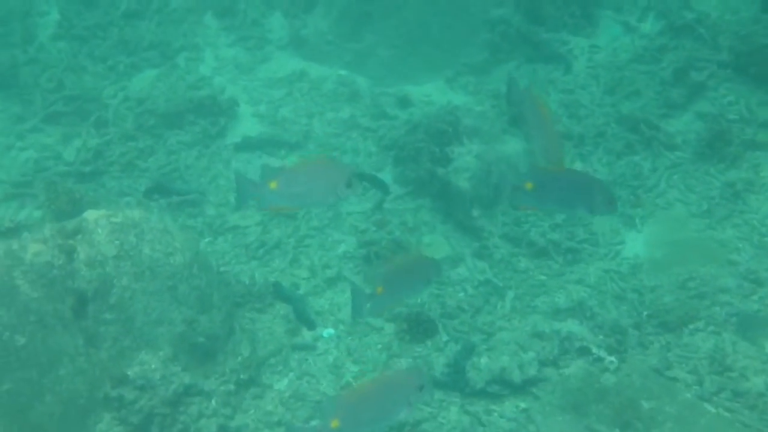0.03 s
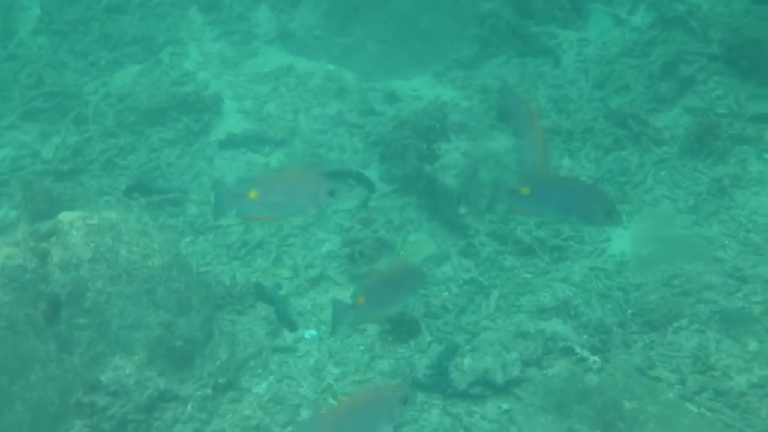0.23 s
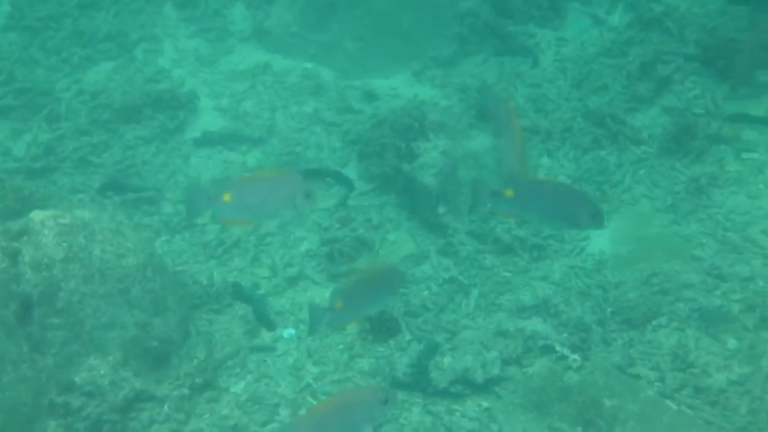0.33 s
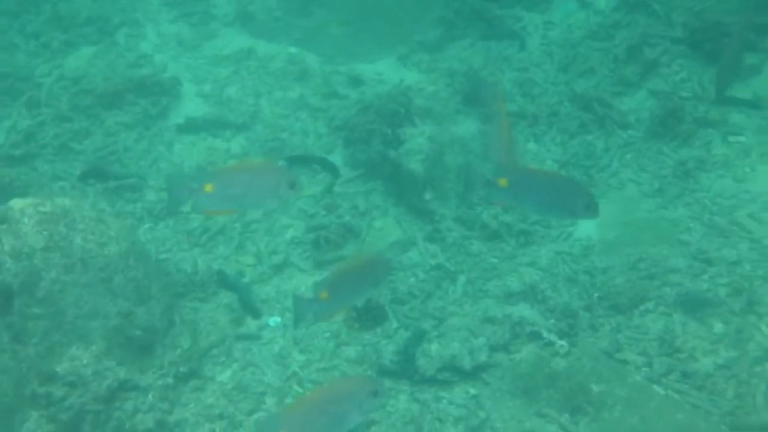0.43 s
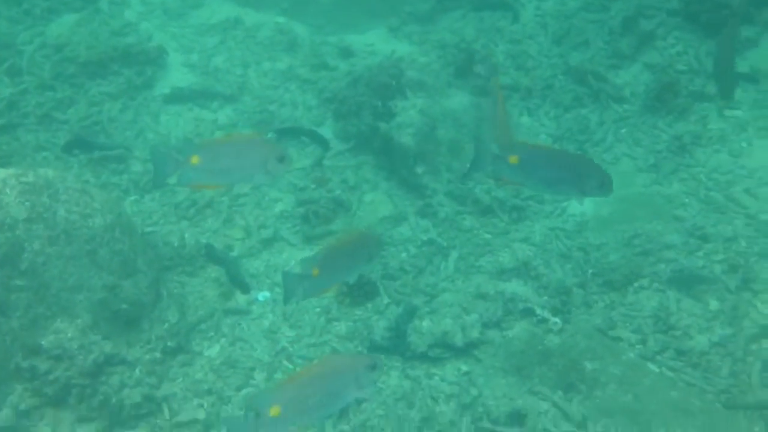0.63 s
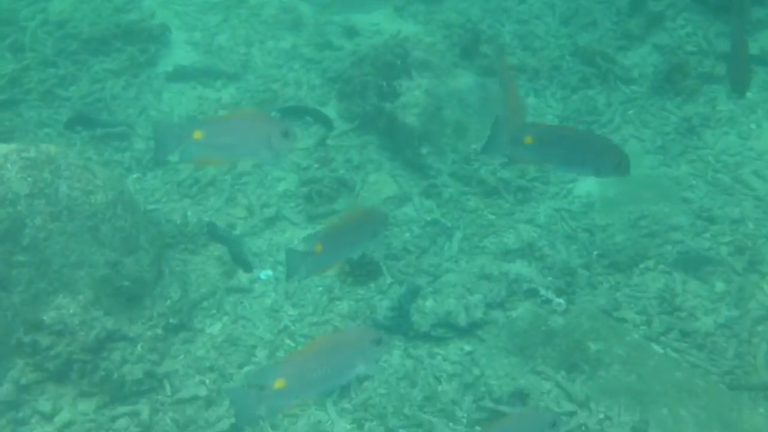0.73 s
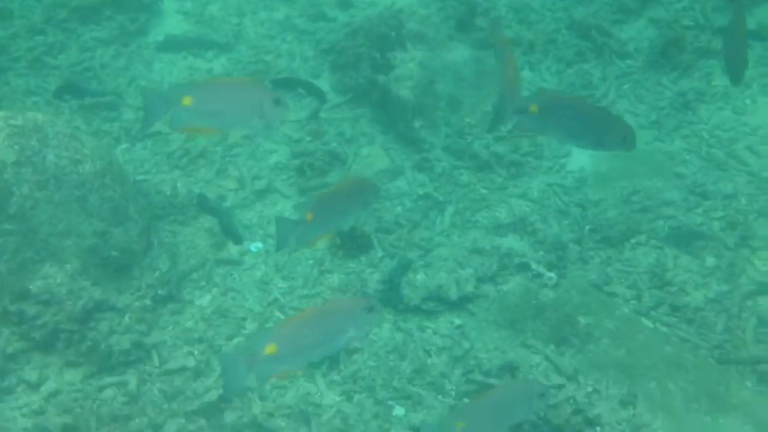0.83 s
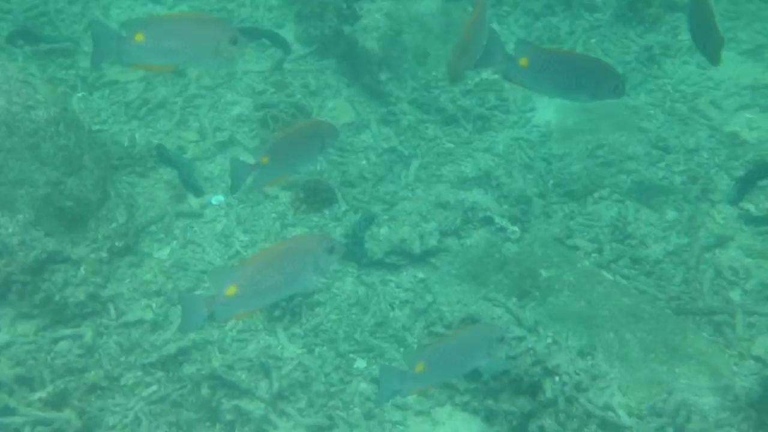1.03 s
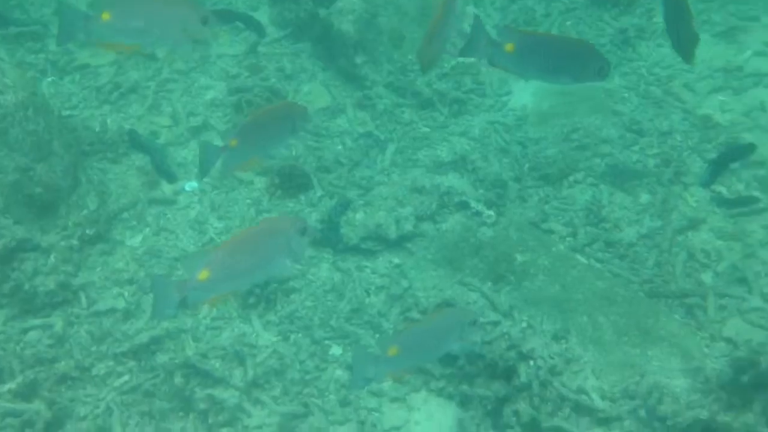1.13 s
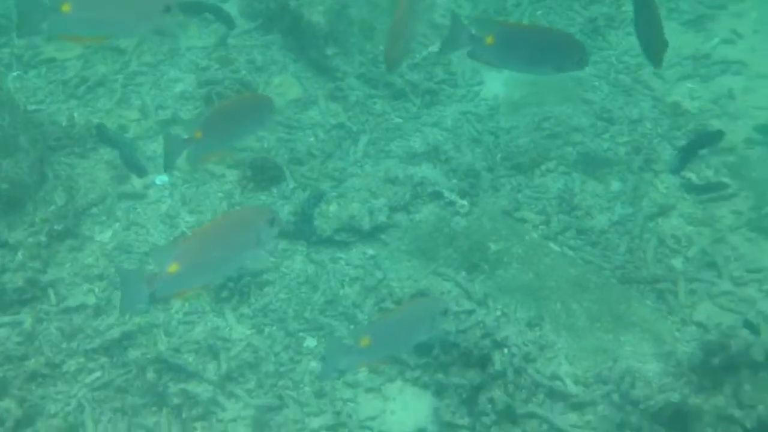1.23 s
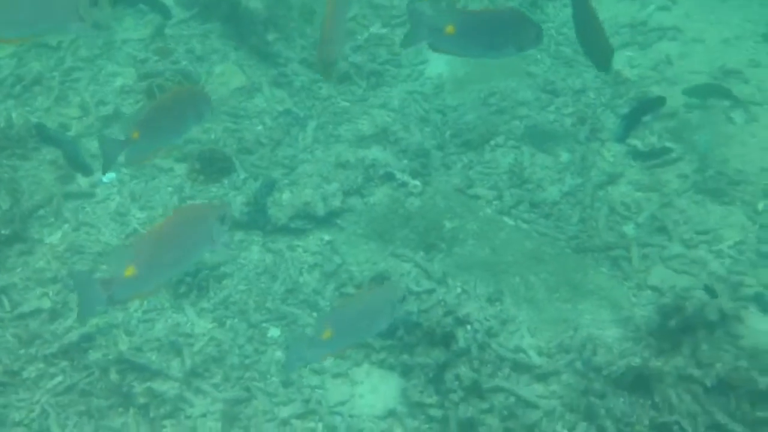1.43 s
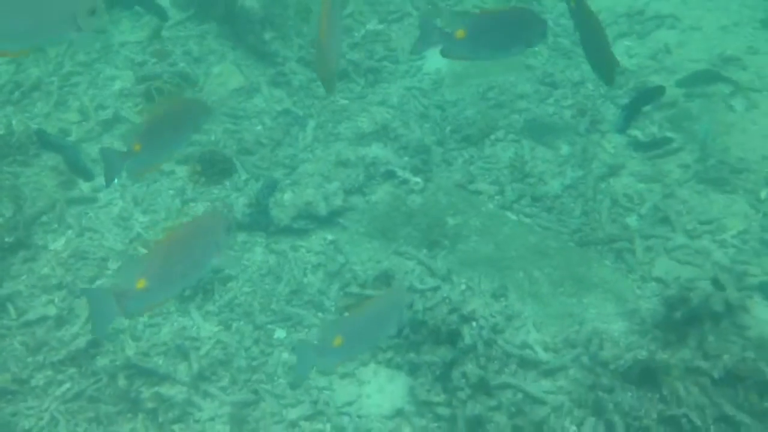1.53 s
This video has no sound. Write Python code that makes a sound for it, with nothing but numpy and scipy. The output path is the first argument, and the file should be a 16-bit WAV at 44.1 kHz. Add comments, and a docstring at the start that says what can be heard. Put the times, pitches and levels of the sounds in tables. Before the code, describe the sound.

Snapping shrimp crackle irregularly for about 1.6 seconds underwater on a shallow reef: short, bright, dry clicks with tiny reflections over a dense, faint distant crackle. Dull knocks gather early, with one strong low thump near 0.24 s and weaker ones after. A hollow low surge swells around 0.8-1.1 s, then eases; some stronger snaps follow at 1.13-1.43 s. Muffled case sound, steady water, faint hiss.

```python
"""A camera in a sealed case, under water over a shallow coral reef.
Snapping shrimp crackle throughout: each near click rings the damped modes of the case and echoes off the
reef, over a dense far crackle. Short dull knocks (fish or the case) are decaying tones, the strongest
near 0.24 s. Surge is noise in two groups of low resonances, swelling together around 0.9 s.
Shaped noise makes the steady water and the faint microphone hiss."""
import sys
import numpy as np
from scipy import signal
from scipy.fft import rfft, irfft
from scipy.io import wavfile

SR = 44100
rng = np.random.default_rng(int(sys.argv[2]) if len(sys.argv) > 2 else 0)


def unload_wav(signal):
    """Save mono or channel-first audio to the path in sys.argv[1] as 16-bit WAV at rate SR, clipped to [-1, 1]."""
    wavfile.write(
        sys.argv[1],
        SR,
        np.round(np.clip(np.atleast_2d(signal).T, -1, 1) * 32767).astype(np.int16),
    )


def decibels_to_gain(level_db):
    """Convert a level in decibels to a linear amplitude gain (20 dB per decade)."""
    exponent = np.asarray(level_db, float) / 20
    return 10 ** exponent


N = 70560   # samples: 1.6 s


def near_snaps():
    """Impulse excitation: each snap is a bare crack plus treble and body rings, all with reflections."""
    # near shrimp snaps, levels before the offsets below: (time [s], treble level [dB], body level [dB],
    # crack level [dB], treble centre [Hz], body tilt [dB per octave])
    snaps = [(0.0138, -41.5, -64, -72.0, 4250, 1), (0.021, -30.5, -48, -55, 4870, -2),
             (0.0602, -38.5, -47, -76.0, 4160, -6), (0.0666, -39, -38.5, -75.0, 4150.0, 3.5),
             (0.0878, -33.0, -37.5, -56, 4130.0, 5.5), (0.0916, -34.0, -41.5, -64, 5240, 3),
             (0.1158, -37, -41.5, -72.0, 4380.0, -6), (0.1419, -41.5, -51, -64, 5500, -1.0),
             (0.2255, -55, -67, -63.0, 4800, 4), (0.2544, -48, -45, -74.0, 4500, 1),
             (0.2563, -43, -49, -73.0, 4570, -1), (0.2625, -46, -63, -61.0, 5450.0, -1.0),
             (0.2864, -39, -46, -76, 4200, 4.5), (0.3169, -37.5, -43.5, -72, 4300, 2),
             (0.3442, -44, -54, -73.0, 4200, 1), (0.3931, -32.5, -36.5, -51.5, 4820.0, -7),
             (0.4031, -47.0, -45, -60, 5700, -4), (0.4256, -56, -49, -76.0, 5000.0, -8),
             (0.4305, -43, -61, -78.0, 4700, -5), (0.489, -50, -62, -74.0, 4730.0, -1.0),
             (0.5021, -47, -61, -73.0, 4400, -4), (0.5127, -52, -54, -72.0, 4770.0, -1.0),
             (0.5418, -45, -50, -71, 5140, -2), (0.599, -48.0, -69, -59.5, 4790.0, -3),
             (0.6045, -45, -60, -75.0, 4240.0, -1.0), (0.6107, -45.5, -44, -75.0, 4280.0, 3.5),
             (0.617, -43, -59, -65, 4760, 3), (0.673, -33.0, -43.5, -64, 4700, 2.0),
             (0.689, -45, -69, -58.0, 5330.0, -1.0), (0.7656, -50, -64, -75.0, 4780.0, -1.0),
             (0.8122, -33, -32.5, -78.0, 4550, -1), (0.8417, -31, -31.0, -54.5, 4650.0, -1.5),
             (0.8916, -46, -57, -67, 4200, 2), (0.9364, -45, -57, -75.0, 4800, -3),
             (0.941, -31.0, -39, -53, 4620, -1), (1.0035, -47, -63, -76.0, 4570, -3),
             (1.037, -43, -44, -78.0, 4230, 3), (1.0447, -41, -33, -75.0, 4400.0, 0.5),
             (1.0801, -32.0, -59, -50, 5300, -4), (1.114, -53, -57, -75.0, 4750, 1),
             (1.1335, -26.5, -29, -61, 4000, 2), (1.157, -47, -61, -72.0, 4470, -6),
             (1.2093, -53, -31, -72.0, 4700, -10), (1.2927, -47.5, -45, -60, 4390.0, 3),
             (1.3286, -49, -25, -60, 4060.0, -4), (1.3617, -43.0, -49, -76.0, 4240.0, 3),
             (1.3634, -44, -50, -76.0, 4500, 3), (1.4071, -43, -47, -62, 4360.0, 3),
             (1.4339, -27.0, -33.5, -55, 4760, -10), (1.4495, -48, -48, -75.0, 5700, 5),
             (1.478, -41.5, -53, -75.0, 4460.0, 3), (1.4895, -45.5, -54, -64, 5700, 4),
             (1.4977, -40, -56, -74.0, 4550.0, -1.0), (1.5072, -44.0, -61, -76.0, 4310.0, -4),
             (1.5521, -40, -45.5, -76.0, 5180.0, 4), (1.5573, -38, -42, -73.0, 4190.0, 0)]
    treble_offset_db, body_offset_db, crack_offset_db = -4, -6, 12.5
    time_s, treble_db, body_db, crack_db, centre_hz, tilt_db = np.transpose(snaps)
    at = (time_s * SR).astype(int)
    clicks = np.zeros(N)
    clicks[at] = decibels_to_gain(crack_db + crack_offset_db)
    bright = treble(at, treble_db + treble_offset_db, centre_hz) + crack(clicks)
    low = body(at, body_db + body_offset_db, tilt_db)
    return scatter(bright, tail_db=-26) + scatter(low, tail_db=-10)   # the low ring scatters more


def treble(at, db, centre_hz):
    """Modal synthesis: the high case modes, excited most strongly near each snap's centre frequency."""
    # high modes of the case: (frequency [Hz], relative level [dB], 60 dB decay time [s])
    treble_modes = [(3560, 1, 0.0093), (3835, -0.5, 0.0089), (4300, 3.5, 0.0065), (4860, -0.5, 0.0089),
                    (5370, -1, 0.0067), (6150, -1, 0.0058), (6830, -1, 0.0095), (7650, 1.5, 0.0084)]
    focus_db_per_oct2 = 53   # modes away from the centre ring weaker

    def focus_db(hz):
        return -focus_db_per_oct2 * np.log2(hz / centre_hz) ** 2

    return strike(at, db, treble_modes, focus_db, sign=-1)


def body(at, db, tilt_db):
    """Modal synthesis: the low case modes, with a spectral tilt about 1 kHz for each snap."""
    # low modes of the case: (frequency [Hz], relative level [dB], 60 dB decay time [s])
    body_modes = [(610, -5, 0.011), (780, 0.5, 0.011), (936, -3, 0.011), (1250, -2.5, .012),
                  (1670, -3, 0.0064), (1970, -2.5, 0.0048), (2410, -5.5, 0.0043), (3110, -7.5, 0.0041)]
    rung = strike(at, db, body_modes, lambda hz: tilt_db * np.log2(hz / 1000), sign=1)
    band = signal.butter(2, [480, 3300], "band", fs=SR, output="sos")
    return signal.sosfilt(band, rung)


def crack(clicks):
    """Broadband impulse: high-passing leaves the bare click without the case modes."""
    return signal.sosfilt(signal.butter(2, 7000.0, "high", fs=SR, output="sos"), clicks)


def strike(at, db, modes, colour_db, sign):
    """Modal superposition: every click rings every mode at a random strength; the case dulls the sum."""
    mode_spread_db, case_dull_hz = 1.5, 8200
    out = np.zeros(N)
    luck = rng.standard_normal((len(at), len(modes)))
    for k, (hz, level_db, t60) in enumerate(modes):
        strength_db = db + level_db + mode_spread_db * luck[:, k] + colour_db(hz)
        clicks = np.zeros(N)
        np.add.at(clicks, at, decibels_to_gain(strength_db) * sign ** k)   # sign -1 alternates the polarity of the modes
        out -= ring(clicks, hz, t60)
    return signal.sosfilt(signal.butter(4, case_dull_hz, "low", fs=SR, output="sos"), out)


def ring(drive, hz, t60):
    """Damped resonator: a two-pole filter answers a unit click with a decaying sine."""
    radius = decibels_to_gain(-60 / (t60 * SR))
    angle = 2 * np.pi * hz / SR
    poles = [1, -2 * radius * np.cos(angle), radius * radius]
    return signal.lfilter([0, np.sin(angle)], poles, drive + 1e-18)


def scatter(x, tail_db):
    """Multipath propagation: direct sound, one echo and a short, sparse, decaying tail off the reef."""
    echo_s, echo_db, tail_t60_s = 0.0045, -16, 0.035
    t = np.arange(SR // 10) / SR
    path = decibels_to_gain(tail_db - 60 * t / tail_t60_s) * rng.standard_normal(len(t))
    path = path * (rng.random(len(t)) < 0.05)   # few of the samples carry a reflection
    path[0] = 1   # direct sound
    path[int(echo_s * SR)] += decibels_to_gain(echo_db)
    return signal.fftconvolve(x, path)[:N]


def far_snaps():
    """Random point process: dense distant snaps, their rate drifting, ring the modes of the same case."""
    median_per_s, rate_drift_db = 700, 3.0
    treble_rms_db, body_rms_db = -63.5, -67
    born = rng.random(N) < median_per_s * decibels_to_gain(rate_drift_db * drift(8.0)) / SR
    db = 4 * np.minimum(rng.exponential(1, N), 3.5)   # many weak, few strong
    centre_hz = 4750 * 2 ** (0.24 * rng.standard_normal(N))   # spread in octaves
    at = np.flatnonzero(born)
    bright = rms_one(treble(at, db[at], centre_hz[at]))
    low = rms_one(body(at, db[at], 0))
    return decibels_to_gain(treble_rms_db) * bright + decibels_to_gain(body_rms_db) * low


def knocks():
    """Transient oscillation: a few cycles swell, sag in pitch and die, the first swing negative."""
    # dull knocks: (time [s], envelope peak [dB], final frequency [Hz], nominal length [cycles])
    knock_list = [(0.062, -34, 104, 2.5), (0.11, -46, 150, 1.3), (0.17, -32.5, 528, 5.6),
                  (0.19, -38.5, 179, 6.9), (0.214, -28.5, 106.5, 1.85), (.2358, -14, 153.5, 1.6),
                  (.250, -42, 650, 8.5), (.260, -32, 174, 1.3), (0.269, -37.5, 140, 3.5),
                  (.292, -48, 444, 7.1), (0.289, -36.5, 119, 1.3), (0.345, -38, 206, 9.7),
                  (.348, -43.5, 481, 7), (.385, -52, 166, 1.3), (.423, -41.5, 477, 2.6),
                  (.461, -50, 610, 11), (.49, -44, 453, 2.7), (.538, -43.5, 444, 7.6),
                  (.436, -36.5, 194, 6.9), (.494, -44, 186, 4.2), (0.563, -58, 188, 3.8),
                  (0.581, -42, 164, 3.4), (0.646, -39.5, 150, 7.6), (.650, -48, 73, 1.9),
                  (.850, -36.5, 568, 24), (.80, -42.5, 202.7, 12.6), (0.931, -42.5, 193, 9.9),
                  (1.011, -39.5, 202, 15), (1.14, -38.5, 205, 5.6), (1.2125, -33.5, 820, 3.5),
                  (1.3295, -38.5, 760, 4.6), (1.231, -53, 85, 1.6), (1.277, -52, 78.5, 2.2),
                  (1.374, -37.5, 108, 1.4), (1.461, -47, 88.5, 2.4), (1.553, -45.5, 93, 2.7)]
    skew, sag_turns = 1.18, 0.24   # envelope power; extra turns from a pitch that starts high
    out = np.zeros(N)
    for start_s, db, hz, cycles in knock_list:
        turns = np.maximum(np.arange(N) / SR - start_s, 0) * hz
        u = turns / cycles * 4.9
        envelope = (u * np.exp(1 - u)) ** skew   # peak 1 at u = 1
        phase = turns + sag_turns * (1 - np.exp(-turns))
        out -= decibels_to_gain(db) * envelope * np.sin(2 * np.pi * phase)
    return out


def surge():
    """Resonant filtering: noise in two groups of case resonances, each following its own level curve."""
    # level curves of the surge: (time [s], low hum level [dB], upper hum level [dB])
    surge_levels = [(0.0, -53, -64.5), (0.204, -55, -60.5), (0.48, -57.5, -65), (0.618, -50, -53),
                    (0.842, -41, -47), (0.94, -43.5, -45.5), (1.068, -43, -49), (1.246, -49.5, -52),
                    (1.42, -48.5, -54), (1.6, -55, -49)]
    # low resonances: (frequency [Hz], nominal width [Hz], relative level [dB])
    low_peaks = [(150, 32, -6), (189.9, 37.7, -3.5), (237, 27.6, -13.5)]
    # upper resonances: (frequency [Hz], nominal width [Hz], relative level [dB])
    upper_peaks = [(475, 58, -6.5), (557.2, 38.3, 0), (650, 104, -9.5), (820, 510, -12)]
    time_s, low_db, upper_db = np.transpose(surge_levels)
    t = np.arange(N) / SR
    low = decibels_to_gain(np.interp(t, time_s, low_db)) * hum(low_peaks)
    upper = decibels_to_gain(np.interp(t, time_s, upper_db)) * hum(upper_peaks)
    return low + upper


def hum(peaks):
    """Resonant filtering: noise passes twice through each resonance, its level wavering; rms 1."""
    waver_db, waver_hz, low_cut_hz = 1.0, 15, 143
    out = 0
    for hz, width, db in peaks:
        noise = rng.standard_normal(N + SR // 4)   # the extra lead lets the resonance build up
        once = ring(noise, hz, 1.1 / width)
        twice = ring(once, hz, 1.1 / width)
        tone = rms_one(np.diff(twice)[-N:])   # the difference weakens the bass skirt
        out = out + decibels_to_gain(db + waver_db * drift(waver_hz)) * tone
    return rms_one(signal.sosfilt(signal.butter(3, low_cut_hz, "high", fs=SR, output="sos"), out))


def drift(rate):
    """Low-passed random process: noise slowed to a corner near rate [Hz]; rms 1."""
    r = np.exp(-2 * np.pi * rate / SR)
    slow = signal.lfilter([1], [1, -2 * r, r * r], rng.standard_normal(N + SR))
    return rms_one(slow[SR:])


def water():
    """Stationary noise: the steady water sound is noise with a fixed spectrum."""
    # water spectrum: (frequency [Hz], relative density [dB per Hz])
    water_spectrum = [(20, -22), (40, 6.5), (70, 9), (110, -45.5), (330, -13.5), (1000, -16), (2000, -11.5),
                      (2900, -17.5), (4400, -8), (7000, -14.5), (9300, -78)]
    return decibels_to_gain(-68) * coloured(water_spectrum)


def hiss():
    """Stationary noise: the self-noise of the microphone, mostly in the treble."""
    # hiss spectrum: (frequency [Hz], relative density [dB per Hz])
    hiss_spectrum = [(5000, -30), (8500, -0.5), (9300, -11.5), (10500, -8), (13000, -2), (15300, 2),
                     (17000, -33)]
    return decibels_to_gain(-77) * coloured(hiss_spectrum)


def coloured(points):
    """Spectral shaping: white noise weighted by a curve over log frequency; rms 1."""
    hz, db = np.transpose(points)
    grid = np.maximum(np.arange(N // 2 + 1) * SR / N, 1)
    curve_db = np.interp(np.log(grid), np.log(hz), db, left=-60, right=-60)
    return rms_one(irfft(rfft(rng.standard_normal(N)) * decibels_to_gain(curve_db), N))


def rms_one(x):
    """Normalisation: divide by the root mean square, so that the mean power is 1."""
    return x / np.sqrt(np.mean(x ** 2) + 1e-20)


def scene():
    """Linear superposition: the pressures of shrimp, knocks, surge and water add."""
    return (near_snaps() + far_snaps() + knocks() + surge() + water())[None]


def roll_off(x):
    """The treble ends steeply here."""
    return signal.sosfilt(signal.butter(12, 16190, fs=SR, output="sos"), x)


def record(dry):
    """Band limiting: the microphone drops the deep bass and adds hiss; then the top is cut."""
    low_cut_hz, top_stop_hz = 76, 15350
    x = signal.sosfilt(signal.butter(2, low_cut_hz, "high", fs=SR, output="sos"), dry)
    x = x + hiss()
    mix = signal.sosfilt(signal.cheby2(14, 40, top_stop_hz, fs=SR, output="sos"), x)
    return roll_off(mix)


dry = scene()
out = record(dry)
unload_wav(out)
```